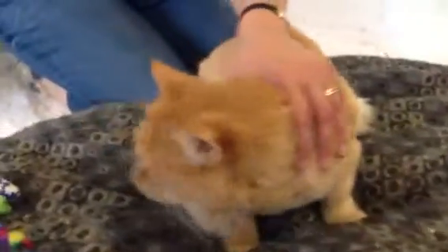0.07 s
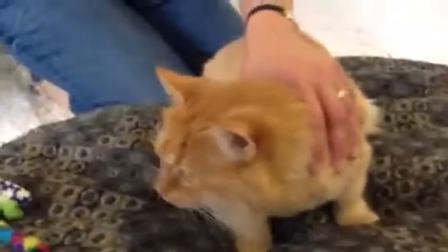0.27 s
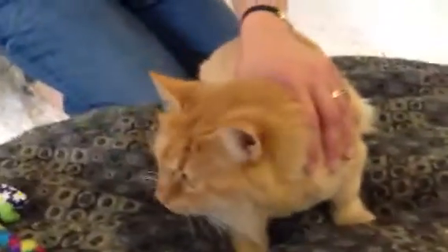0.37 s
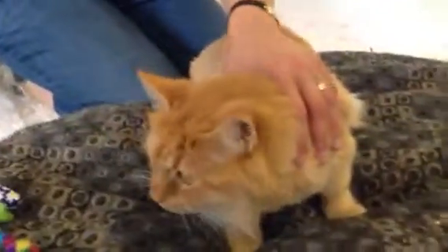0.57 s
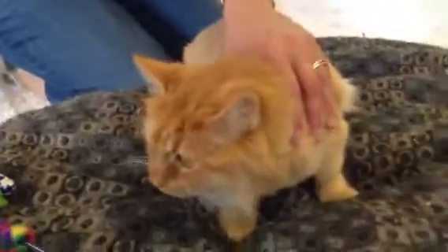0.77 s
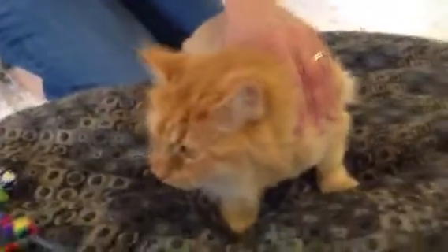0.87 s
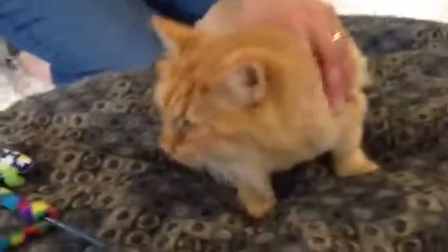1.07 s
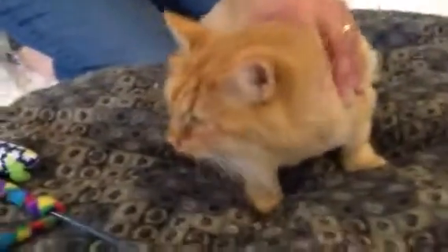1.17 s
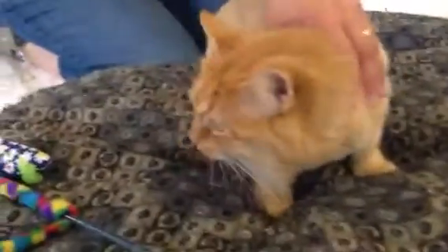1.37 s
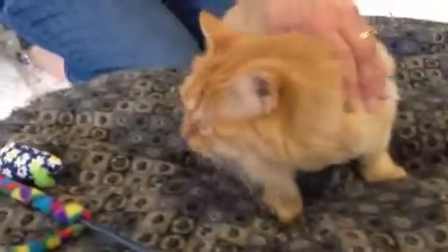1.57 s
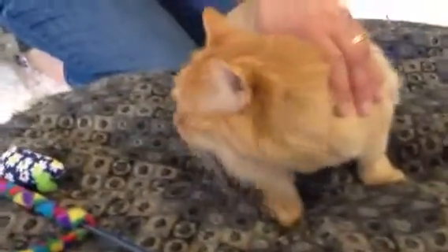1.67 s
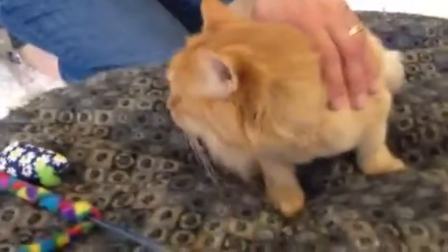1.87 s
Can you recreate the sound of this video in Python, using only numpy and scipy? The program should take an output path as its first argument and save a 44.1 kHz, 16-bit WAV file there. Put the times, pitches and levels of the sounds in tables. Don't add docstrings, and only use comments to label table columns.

```python
import sys
import numpy as np
from scipy import signal
from scipy.fft import rfft, irfft
from scipy.io import wavfile

SR = 44100
rng = np.random.default_rng(int(sys.argv[2]) if len(sys.argv) > 2 else 0)


def master(y):
    cut = np.clip(np.atleast_2d(y).T, -1, 1)
    pcm = np.round(cut * 32767)
    wavfile.write(sys.argv[1], SR, pcm.astype(np.int16))


def how_loud(loudness_db):
    steps = np.asarray(loudness_db, float) / 20
    return 10 ** steps


N = 85995

# (frequency [Hz], level per Hz [dB])
FAN_HISS = [(25, -48), (60, -27), (130, -9.5), (250, -15.5), (734, -16.5), (1840, -18.5), (14800, -34.5),
            (16000, -42)]
# (frequency [Hz], width [Hz], level [dB])
FAN_DRONES = [
    (135.1, 24, -59),
    (183, 31.6, -64),
    (344, 8, -77),
    (359, 3.5, -73.5),
]
# (delay [s], level [dB])
REFLECTIONS = [
    (.0031, -15),
    (.0066, -16),
    (.0097, -14),
    (.0114, -12),
]
# (frequency [Hz], time to fall 60 dB [s])
ROOM_DECAY = [(1000, 1), (3000, .8), (6000, 0.77), (12000, 0.55)]

# (start [s], rise [s], fall [s], top pitch [Hz], peak level [dB])
FULL_PUSHES = [
    (.359, 0.015, 0.023, 1570, -19.5),
    (.594, 0.02, 0.026, 1550, -22),
    (1.286, 0.02074, 0.016, 1467, -25.5),
    (1.648, 0.009, 0.023, 1467, -26.5),
]
HALF_PUSHES = [
    (.108, 0.012, 0.016, 1215, -38.5),
    (1.104, 0.011, 0.009, 1225, -39.5),
    (1.479, 0.0093, 0.0145, 1280, -37),
]
PULL_CHIRPS = [
    (.221, 0.0165, 0.022, 1113, -30.5),
    (.468, .027, 0.01825, 1205, -25.5),
    (.698, 0.02, 0.031, 1179, -27.5),
    (1.198, 0.011, 0.016, 1080, -35.5),
    (1.388, 0.019, 0.02, 1136, -32),
    (1.569, 0.016, 0.0091, 1009, -40.5),
    (1.750, 0.024, .017, 1100, -35.5),
]
# (frequency [Hz], level [dB])
FULL_PUSH_COLOUR = [(1000, 3), (3000, 4.5), (4700, 3.5), (6200, 1), (9200, 3.5), (11000, -7),
                    (13000, -11.5), (16000, -24)]
HALF_PUSH_COLOUR = [(1000, -5.5), (2400, -8), (3600, -14.5), (5000, -14), (7000, -19.5), (9200, -16),
                    (12000, -35), (16000, -34)]
PULL_CHIRP_COLOUR = [(1000, -1.5), (2300, 2), (3500, -5.5), (5000, -10), (7000, -21.5), (9200, -7.5),
                     (12000, -18.5), (16000, -22)]
# (pitch lost at start [share], pitch lost at end [share], level lost at start [dB],
# level lost at end [dB], bend of rise [exponent], bend of fall [exponent])
FULL_PUSH_ARCH = (0.1847, 0.0946, 9.7, 4.75, 4.16, 2.52)
HALF_PUSH_ARCH = (0.206, 0.152, 6, 7.4, 1.65, 1.9)
PULL_CHIRP_ARCH = (0.1386, 0.1, 3.9, 3.1, 2.55, 2.52)
# (air noise [dB], flutter of each harmonic [dB], dulling at slack pressure [dB per octave])
FULL_PUSH_GRAIN = (-22, 3, 2)
HALF_PUSH_GRAIN = (-20, 3, 7)
PULL_CHIRP_GRAIN = (-20, 4, 5)


def unit_rms(x):
    return x / np.sqrt(np.mean(x ** 2) + 1e-20)


def at_hz(points, hz):
    table_hz, value = np.array(points).T[:2]
    return np.interp(np.log(hz), np.log(table_hz), value)


def band_pass(x, low_hz, high_hz):
    return signal.sosfilt(signal.butter(2, [low_hz, high_hz], "band", fs=SR, output="sos"), x)


def resonance(x, hz, width_hz):
    r = np.exp(-np.pi * width_hz / SR)
    poles = [1, -2 * r * np.cos(2 * np.pi * hz / SR), r * r]
    return signal.lfilter([(1 - r * r) / 2, 0, (r * r - 1) / 2], poles, x)


def fan():
    hz = np.maximum(np.arange(N // 2 + 1) * SR / N, 10)
    spectrum = rfft(rng.standard_normal(N)) * how_loud(at_hz(FAN_HISS, hz))
    sound = how_loud(-58.5) * unit_rms(irfft(spectrum, N))
    for drone_hz, width_hz, db in FAN_DRONES:
        drone = rng.standard_normal(N + SR)
        for _ in range(2):
            drone = resonance(drone, drone_hz, width_hz)
        sound += how_loud(db) * unit_rms(drone[SR:])
    return sound


def diffuse_tail(t, build):
    edges = 700 * 2 ** np.arange(0, 5, .5)
    tail = np.zeros(SR)
    for low, high in zip(edges, edges[1:]):
        band = band_pass(rng.standard_normal(SR), low, high)
        tail += band * how_loud(-60 * t / at_hz(ROOM_DECAY, np.sqrt(low * high)))
    tail *= build
    return how_loud(-17.5) * tail / np.sqrt(np.sum(tail ** 2))


def near_reflections(t, build):
    near = rng.standard_normal(SR) * how_loud(-60 * t / .07) * build
    near *= how_loud(-17) / np.sqrt(np.sum(near ** 2))
    for n, (delay, db) in enumerate(REFLECTIONS):
        near[int(delay * SR)] += how_loud(db) * (-1) ** n
    return signal.lfilter(*signal.butter(1, 1000, "high", fs=SR), near)


def room(x):
    build_s = 0.0061
    t = np.arange(SR) / SR
    build = 1 - np.exp(-t / build_s)
    response = diffuse_tail(t, build) + near_reflections(t, build)
    return signal.fftconvolve(x, response)[:N]


def drift(rate_hz, count):
    r = np.exp(-2 * np.pi * rate_hz / SR)
    noise = rng.standard_normal((count, 6000))
    return unit_rms(signal.lfilter([1], [1, -2 * r, r * r], noise)[:, 2000:])


def pull_whistle():
    top_hz, drop_hz, length_s = 1740, 466, .013
    u = np.linspace(0, 1, int(length_s * SR))
    phase = 2 * np.pi * np.cumsum(top_hz - drop_hz * u ** 4) / SR
    return np.sin(phase) * u * np.sin(np.pi * u)


def chirps(rows, colour, arch, grain, pull):
    edge_s, stop_s, air_lag_s = 0.0028, .004, .008
    flutter_hz, wobble, phase_lag = 90, 0.0076, .02
    start_bend_share, end_bend_share, start_drop_db, end_drop_db, rise_bend, fall_bend = arch
    air_db, flutter_db, dulling_db = grain
    out = np.zeros(N + SR)
    k = np.arange(1, 17)[:, None]
    t = np.arange(4000) / SR
    for start, rise, fall, top_hz, db in rows:
        up = t < rise
        slack = np.clip(np.where(up, 1 - t / rise, (t - rise) / fall), 0, 2)
        slack = slack ** np.where(up, rise_bend, fall_bend)
        chance = drift(flutter_hz, count=17)
        pitch_loss = np.where(up, start_bend_share, end_bend_share) * slack
        hz = top_hz * np.maximum(1 - pitch_loss + wobble * chance[0], .5)
        level_db = db - np.where(up, start_drop_db, end_drop_db) * slack

        tops_db = at_hz(colour, k * hz) + flutter_db * np.minimum(k / 2.9, 1) * chance[1:]
        tops_db = tops_db - dulling_db * slack * np.log2(k)
        tops = how_loud(tops_db) * (k * hz < 17000)
        phase = 2 * np.pi * np.cumsum(hz) / SR
        tone = np.sum(tops * np.sin(k * phase + np.pi / 8 - phase_lag * k ** 1.5), axis=0)
        tone /= np.sqrt(np.sum(how_loud(at_hz(colour, k * top_hz)) ** 2) / 2)

        air = unit_rms(band_pass(rng.standard_normal(len(t)), 1500, 12000)) * (1 + np.cos(phase))
        stop = np.exp(-np.maximum(t - rise - fall, 0) / stop_s)
        swell = how_loud(level_db) * np.clip(t / edge_s, 0, 1) * stop
        lag = np.exp(-1 / (air_lag_s * SR))
        air_swell = signal.lfilter([1 - lag], [1, -lag], swell)

        i = int(start * SR)
        polarity = (-1) ** pull
        out[i:i + len(t)] += polarity * swell * tone + how_loud(air_db) * air_swell * air
        if pull:
            lead = pull_whistle()
            j = i + int(edge_s * 2 * SR)
            out[j - len(lead):j] += how_loud(db - 5.5) * lead
    return out[:N]


def squeaky_toy():
    voice = chirps(FULL_PUSHES, FULL_PUSH_COLOUR, FULL_PUSH_ARCH, FULL_PUSH_GRAIN, pull=False)
    voice += chirps(HALF_PUSHES, HALF_PUSH_COLOUR, HALF_PUSH_ARCH, HALF_PUSH_GRAIN, pull=False)
    voice += chirps(PULL_CHIRPS, PULL_CHIRP_COLOUR, PULL_CHIRP_ARCH, PULL_CHIRP_GRAIN, pull=True)
    return signal.sosfilt(signal.butter(1, 120, "high", fs=SR, output="sos"), voice)


def scene():
    voice = squeaky_toy()
    return (voice + room(voice) + fan())[None]


def roll_off(x):
    return signal.sosfilt(signal.butter(12, 16280, fs=SR, output="sos"), x)


def record(dry):
    mix = signal.sosfilt(signal.ellip(10, .5, 45, 15350, fs=SR, output="sos"), dry)
    return roll_off(mix)


dry = scene()
out = record(dry)
master(out)
```